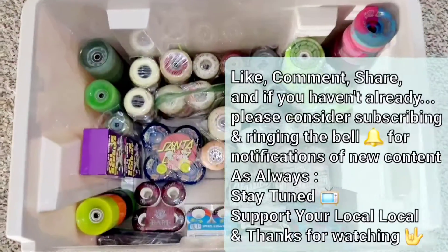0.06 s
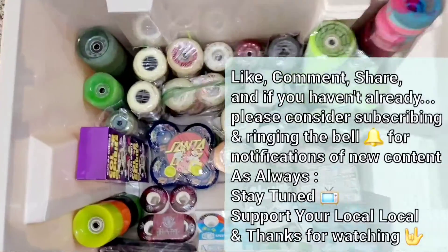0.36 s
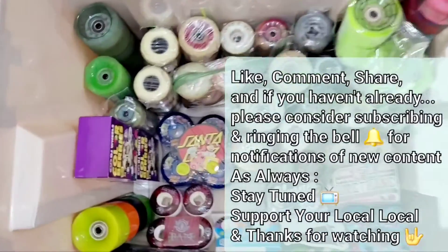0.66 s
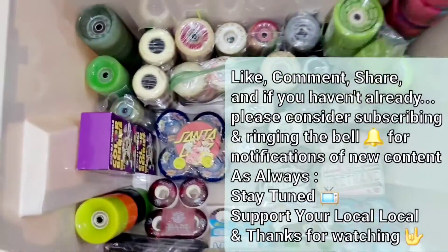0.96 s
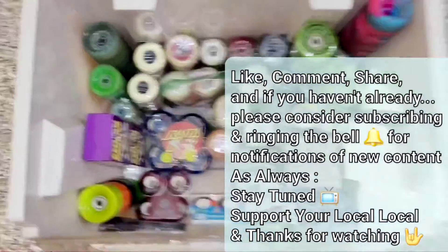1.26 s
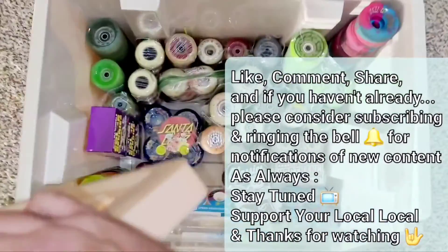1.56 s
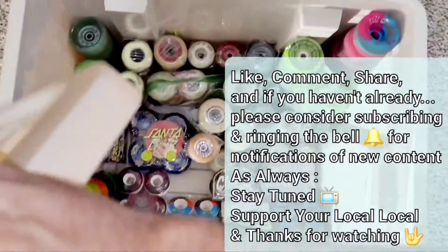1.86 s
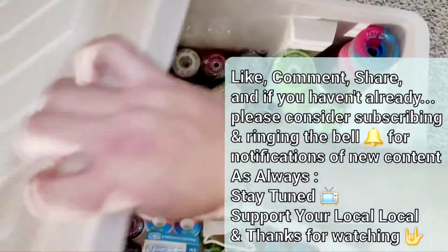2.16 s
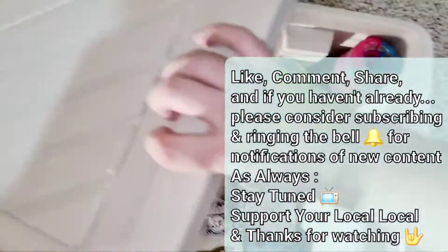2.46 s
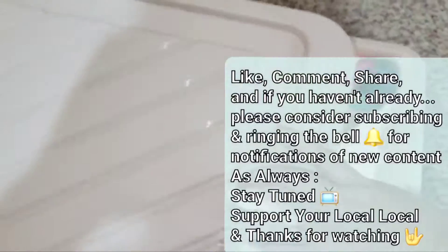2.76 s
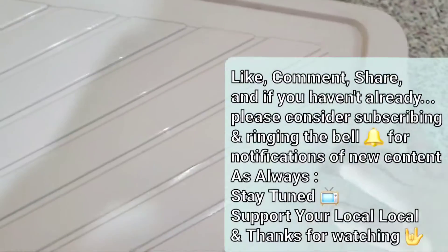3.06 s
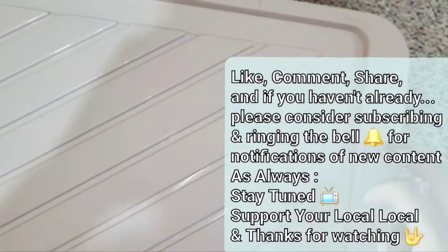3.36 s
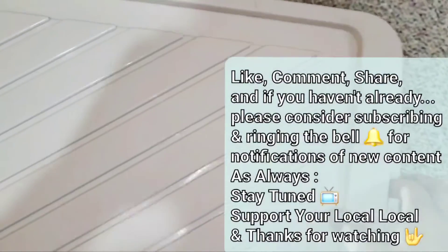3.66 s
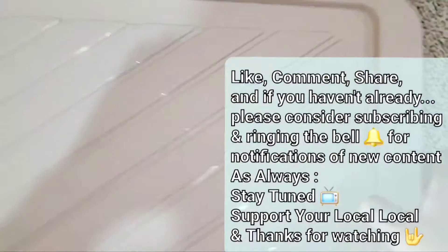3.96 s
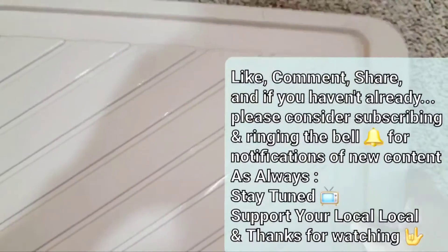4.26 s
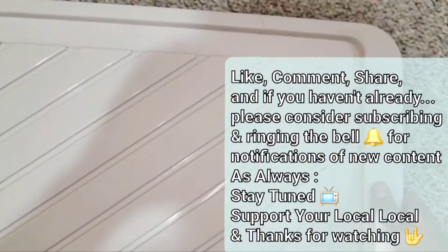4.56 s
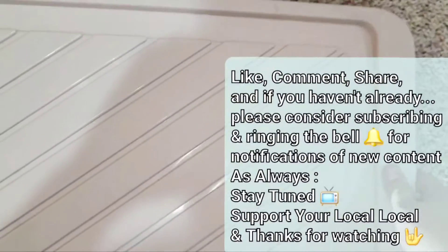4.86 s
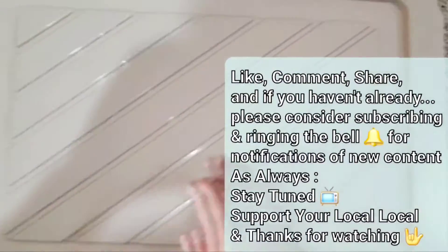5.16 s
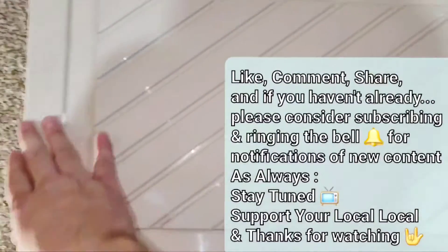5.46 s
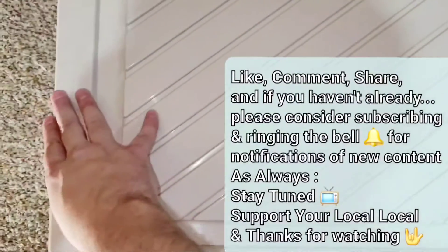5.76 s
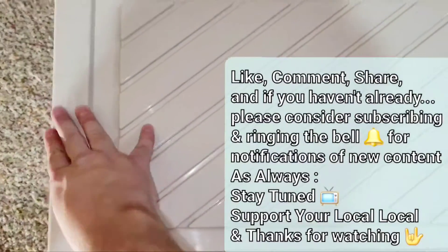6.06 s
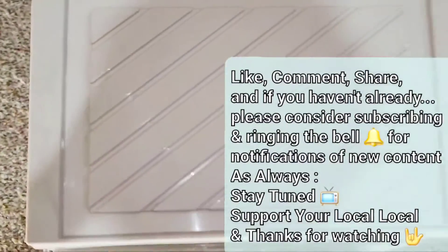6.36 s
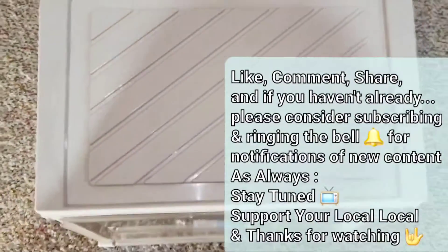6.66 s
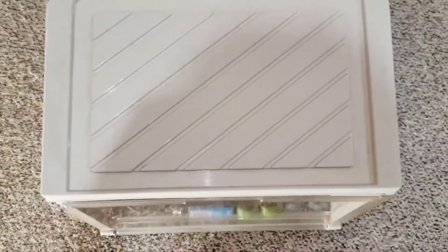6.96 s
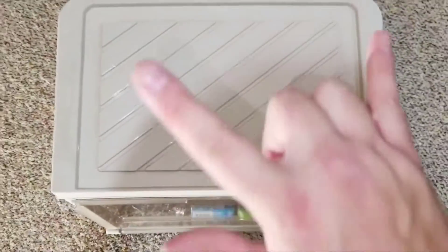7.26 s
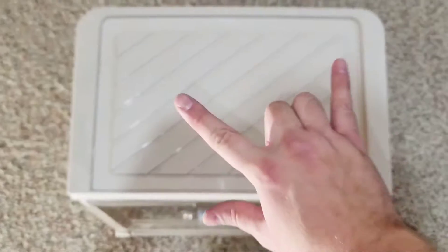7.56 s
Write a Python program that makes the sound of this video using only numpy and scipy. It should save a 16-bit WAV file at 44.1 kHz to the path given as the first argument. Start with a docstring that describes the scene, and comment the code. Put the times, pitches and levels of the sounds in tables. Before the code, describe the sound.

Hollow plastic clatter and rubbing as a lid is slid and pressed onto a tote indoors, ending with a firm snap.

```python
"""Knocks, scrapes and hollow thumps: a plastic lid is laid on a full storage tote, slid into place
and pressed until it snaps home. The rim strikes and rubs the tub and slips over its lip; the wide
panels flex and boom; a small carpeted room answers. Behind it, a faint beating motor hum and a wash
of air. Stereo, at two close microphone ports."""
import sys
import numpy as np
from scipy import signal
from scipy.fft import rfft, irfft
from scipy.io import wavfile
from scipy.ndimage import uniform_filter1d

SR = 44100
rng = np.random.default_rng(int(sys.argv[2]) if len(sys.argv) > 2 else 0)


def wav_record(signal):
    """Record a signal, one row per channel, as 16-bit PCM in the file named by sys.argv[1]."""
    frames = np.transpose(np.atleast_2d(signal))
    bounded = np.clip(frames, -1, 1)
    # unit amplitude maps onto the largest positive 16-bit level
    quanta = np.round(bounded * 32767).astype(np.int16)
    wavfile.write(sys.argv[1], SR, quanta)


N = 339478
TIME = np.arange(2 ** 15) / SR  # one event's buffer
HZ = np.fft.rfftfreq(len(TIME), 1 / SR)
TAIL_FADE = np.clip(3 - 4 * TIME / TIME[-1], 0, 1)
LEAD_S = 64 / SR  # headroom for the earlier port

# rim contacts: (time [s], strength [dB], hardness [steps of ~1 dB/octave], struck spot [Hz],
# after-ring over crack [dB], panel thump [dB], thump tilt [dB/band])
RIM_CONTACTS = [(0.9083, -5.5, 2, 1870, -1, -66, -11), (1.2412, -7, 0, 2830, -13, -71, 1),
                (1.2714, -11, 1.5, 1340, -2, -60.5, 14.5), (1.441, -4, 0.5, 2230, -0.5, -62, 9),
                (1.468, -6, 0.5, 2300, -14, -83, 7), (1.5713, 22.5, 0.48, 1970, -2, -25, 4),
                (1.6446, 19.5, -0.5, 1920, -7, -28.5, 4.5), (2.074, -3.5, 1.5, 3870, -17, -67, -12),
                (2.2898, 24, -0.15, 2350, -7, -29, 14), (2.331, 23, -0.5, 3380, -3, -23.5, 11.5),
                (2.347, 13, 4.5, 660, -8.5, -36.5, -4.5), (2.3753, 12, 2, 1790, -8, -60, 0),
                (2.424, 9.5, 0, 1710, -2.5, -36.5, -3.5), (2.5067, 22.5, 0.44, 1190, -11, -26.5, 5),
                (2.548, 6, 1, 630, 3.5, -29, 6), (2.5994, 21, 0.7, 2840, -12, -34.5, -5),
                (2.6837, 19, 2, 1200, -8, -42.5, 22.5), (2.691, 20.5, -1, 1320, -18, -26.5, 2.5),
                (2.7449, 13, 0.5, 680, -5.5, -33, 8), (2.7905, 10, -0.1, 2170, -4.5, -46, -2),
                (2.8233, 13.5, 0, 1800, -5, -28, -2.5), (2.8315, 13, -1.5, 1990, -8, -42, 9),
                (2.8781, 4, 1, 604, 1.5, -37, 6), (2.983, -0.5, -6, 450, -3.5, -36, 6.5),
                (3.0482, 10.5, -0.5, 1500, -9, -52, -2), (3.1337, 11.5, 0.6, 1600, -9, -35, 1.5),
                (3.6769, -14.5, -16, 478, -11, -43, 6), (3.8052, 15, 1.03, 1060, -10.5, -30.5, 4.5),
                (3.9165, 9, -2.3, 1810, -12, -42, 7.5), (4.044, 5, -2, 674, -7.5, -44, 13.5),
                (4.0909, 1.5, 2, 1740, -3, -38, 7), (4.1288, 13, -3.5, 2140, -8, -24.5, 1),
                (4.144, 7, -3.5, 1490, -4.5, -43, 2), (4.1619, 9, -3, 860, -16, -44, 11),
                (4.2272, 11.5, 0.6, 445, -6, -28.5, 2), (4.234, 4.5, 3.5, 5060, -6.5, -51, 2),
                (4.3484, 12, -2.5, 1460, -7.5, -32.5, 9.5), (4.3721, 8.5, 1.45, 1640, -6.5, -32.5, 3.5),
                (4.417, 2.5, 3, 870, -4, -33.5, 1), (4.451, 4, -1, 620, -5, -32.5, 3.5),
                (4.548, 7, -1, 1583, -14, -43, 6.5), (4.6991, 9.5, 0.55, 2050, -7, -31, 5),
                (4.7118, 8.5, 1.5, 670, -8.5, -40, 2), (4.831, -9, -2, 1760, -9, -71, -5),
                (4.9853, -18, 2, 2380, 2, -62, 4), (5.659, 0, 1.5, 664, -11.5, -41, 5),
                (5.9545, 22, 2.4, 418, -11, -28.5, 3.5), (5.9619, 9.5, 2.5, 3120, 0.5, -58, 3),
                (6.1587, -6, 0, 470, -8.5, -42, 0), (6.346, -12, 3.5, 790, -7, -52.5, -5),
                (6.6292, -10.5, 1, 2980, -8.5, -78, -2)]
# contact position: (time [s], side [-1 right, 1 left])
RIM_SIDE = [(1.6, 0.68), (2.82, 0.76), (2.88, -0.33), (3.13, 0.83), (4.23, 0.67), (4.35, 0.67), (4.45, 0.5),
            (4.55, -0.78), (4.98, -0.11), (5.66, 0.86), (5.95, 0.91), (6.35, 0.76)]
# lid and tub modes: (frequency [Hz], level [dB], free t60 [s])
TOTE_MODES = [(67, 8, 0.59), (82.1, 18, 0.58), (122.4, 7, 0.16), (146.5, 3.5, 0.48), (172, -10, 0.14),
              (221.05, 5.5, 0.92), (238.7, 7.5, 0.3), (298, -31, 1), (377, -11, 0.14), (420.4, 5.5, 0.2),
              (516, 7.5, 0.088), (581, 11, 0.12), (670, 12.5, 0.063), (770, 13, 0.055), (952, 9, 0.1),
              (1020, -22, 0.14), (1350, 6.5, 0.2), (1600, 9.5, 0.13), (1799, 24, 0.025), (1934, 0.5, 0.2),
              (2214, 18, 0.033), (2390, 14, 0.069), (3104, 18.5, 0.026)]
# edges of the three thump bands: (frequency [Hz])
THUMP_EDGES_HZ = [35, 100, 180, 350]
# room field: (frequency [Hz], left-right coherence [-1..1])
ROOM_COHERENCE = [(60, 0.81), (200, 1), (350, 0.6), (600, -0.31), (1400, -0.6), (3000, -0.19), (6000, 0.14)]
# port imbalance: (frequency [Hz], left over right [dB])
PORT_BALANCE_DB = [(100, -6), (400, -1.5), (900, 4), (2600, 2.5), (3400, 4), (4400, -5.5), (6500, -0.5),
                   (8500, -2), (13000, -0.5)]
# microphone response: (frequency [Hz], gain [dB])
MIC_RESPONSE_DB = [(700, -2), (860, -8.5), (1150, -6.5), (3000, -5), (4500, -6.5), (6300, -4),
                   (8200, -13.5), (10000, -13), (13000, -8), (16000, -13)]


def amp(db):
    """Decibels to gain."""
    return 10 ** (np.asarray(db) / 20)


def unit_rms(x):
    """Scale to rms 1."""
    return x / np.sqrt(np.mean(x ** 2) + 1e-20)


def unit_onset(x, span_s=0.04):
    """Scale to unit mean energy per port within the first span_s."""
    return x / np.sqrt(np.sum(x[:, :int(span_s * SR)] ** 2) / 2 + 1e-20)


def curve_at(points, hz):
    """Interpolate (frequency [Hz], value) rows on a log-frequency axis."""
    point_hz, value = np.transpose(points)
    return np.interp(np.log(hz + 1), np.log(point_hz + 1), value)


def add(mix, time_s, sound):
    """Mix in a stereo sound, fading its far tail."""
    part = mix[:, max(round(time_s * SR), 0):][:, :sound.shape[1]]
    fade = np.r_[np.ones(sound.shape[1] - len(TAIL_FADE)), TAIL_FADE]
    part += (sound * fade)[:, :part.shape[1]]


def minimum_phase(gain_db):
    """Causal response with the given gain on HZ."""
    log_gain = np.log(amp(np.maximum(gain_db, -100)))
    mirrored = np.r_[log_gain, log_gain[-2:0:-1]]
    return np.exp(np.conj(signal.hilbert(mirrored)))[:len(gain_db)]


def noise_pair(coherence, size):
    """Spectra of partly coherent white noise at the two ports."""
    left, independent = rfft(rng.standard_normal((2, size)))
    shared = np.clip(curve_at(coherence, np.fft.rfftfreq(size, 1 / SR)), -1, 1)
    return np.array([left, shared * left + np.sqrt(1 - shared ** 2) * independent])


def rim_to_ports(time_s, lag_ms_per_side=0.51, corner_hz=1150):
    """Phase and gain per port: a contact on the left arrives there sooner and louder."""
    side = np.interp(time_s, *np.transpose(RIM_SIDE))
    lag_s = lag_ms_per_side * side / 1000
    turns = HZ * lag_s / np.sqrt(1 + (HZ / corner_hz) ** 2.4)  # levels off in the treble
    pan_db = 1 + side
    return np.exp(1j * np.pi * turns * np.array([[1], [-1]])), amp([[pan_db / 2], [-pan_db / 2]])


def air(treble_db=-58.56, treble_from_hz=900, pan_db=1.1, lag_ms=0.51):
    """Steady moving air and microphone hiss, reaching the left port first."""
    # (frequency [Hz], relative density [dB])
    density_db = [(15, -64), (25, -24), (70, -5), (153, -18), (242, -8.5), (309, -9.5), (503, -18),
                  (734, -14), (840, -16), (1790, -21.5), (2910, -20), (4610, -33.5), (6210, -35),
                  (9570, -47), (16000, -46.5)]
    # (frequency [Hz], left-right coherence [0..1])
    coherence = [(60, 0.99), (130, 0.32), (290, 0.086), (640, 1), (1410, 0.67), (3100, 0.17),
                 (15000, 0.052)]
    hz = np.fft.rfftfreq(N, 1 / SR)
    delay = np.exp(1j * np.pi * hz * lag_ms / 1000 * np.array([[1], [-1]]))
    spectrum = noise_pair(coherence, N) * delay * amp(curve_at(density_db, hz))
    treble_rms = np.std(irfft(spectrum * (hz > treble_from_hz), N))
    return irfft(spectrum, N) / treble_rms * amp(treble_db) * amp([[pan_db], [-pan_db]])


def motor_hum(drift_rad=0.064, pan_db=2.5, step_back_s=(6.37, 7)):
    """Motor orders of about 64 Hz beat against a mains harmonic near 240 Hz."""
    # the microphone steps back through standing waves:
    # (frequency [Hz], level over the tub [dB], level a step back [dB])
    partials = [(64.7, -68, -64.5), (202, -74, -73), (241, -59.5, -60), (256.3, -57, -70),
                (313, -78, -64.5), (446, -70.5, -78)]
    t, out = np.arange(N) / SR, np.zeros((2, N))
    knots_s = np.linspace(0, t[-1], num=40)
    for hz, *levels_db in partials:
        drift = np.interp(t, knots_s, drift_rad * rng.standard_normal(len(knots_s)))
        rms = amp(np.interp(t, step_back_s, levels_db))
        out += rms * np.sqrt(2) * np.sin(2 * np.pi * hz * t + drift)
    return out * amp([[pan_db], [-pan_db]])


def room_tail(near_gain=0.38, near_s=0.02):
    """Diffuse reflections, treble dying first; the tub's near walls lift the start."""
    # (frequency [Hz], t60 [s])
    decay_times = [(100, 0.76), (400, 0.33), (1100, 0.32), (3000, 0.3), (7000, 0.27), (15000, 0.12)]
    noise = irfft(noise_pair(ROOM_COHERENCE, len(TIME)))
    hz, t, frames = signal.stft(noise, SR, nperseg=256)
    fall_db = -60 * t / curve_at(decay_times, hz)[:, None]
    tail = signal.istft(frames * amp(fall_db), SR)[1][:, :len(TIME)]
    return tail * (1 + near_gain * np.exp(-TIME / near_s))


def friction(pressure, centre_hz, width_octaves, slips_per_s=450, hiss=0.065, slip_db=4.5, skirt_db=-30):
    """Tiny slips on plastic, each ringing briefly in rim and room; loudness follows pressure."""
    slips = (rng.random(N) < slips_per_s / SR) * amp(slip_db * np.minimum(rng.exponential(1, N), 4))
    drive = (slips + hiss * rng.standard_normal(N))[:len(pressure)] * pressure
    rim = unit_onset(irfft(noise_pair(ROOM_COHERENCE, len(TIME))) * np.exp(-TIME / 0.0074))
    room = 0.5 * unit_onset(room_tail(), span_s=0.093)
    resonance = np.exp(-(np.log2((HZ + 1) / centre_hz) / width_octaves) ** 2)
    skirt = amp(skirt_db) * HZ ** 2 / (HZ ** 2 + 300 ** 2) / (1 + (HZ / 6000) ** 2)
    ports = amp(curve_at(PORT_BALANCE_DB, HZ) * np.array([[.5], [-.5]]) + curve_at(MIC_RESPONSE_DB, HZ))
    response = irfft(rfft(rim + room) * (resonance + skirt) * ports) * TAIL_FADE
    sound = signal.fftconvolve(drive[None], response, axes=1)
    return sound * np.sqrt(np.sum(pressure ** 2) / np.sum(sound ** 2))


def rubs(strokes, gain_db=0):
    """Friction strokes, each swelling and fading around one resonance."""
    out = np.zeros((2, N))
    for middle_s, length_s, level_db, centre_hz, width_octaves in strokes:
        pressure = amp(level_db + gain_db) * unit_rms(np.hanning(max(int(length_s * SR), 64)))
        add(out, middle_s - length_s / 2, friction(pressure, centre_hz, width_octaves))
    return out


def hand_brushes():
    """The hand hisses lightly over textured plastic."""
    # (middle [s], length [s], level [dB], centre [Hz], width [octaves])
    strokes = [(0.99, .2, -73, 11000, 0.97), (1.27, 0.042, -66, 4140, .08), (1.8, 0.29, -77, 11200, 0.44),
               (2.72, 0.63, -69, 11000, 0.94), (3.06, 0.16, -58.5, 6600, 0.37),
               (3.23, 0.16, -72.5, 5800, .15), (3.61, 0.087, -76, 11900, 0.9),
               (4.24, 0.089, -57, 12400, 0.39), (4.265, 0.098, -63, 5450, 0.1),
               (5.41, 0.27, -70, 5230, 0.2), (5.83, 0.035, -70, 12000, 0.98), (6.19, 0.053, -72, 11000, 1),
               (6.61, 0.055, -79, 13000, .5), (7.58, 0.44, -74, 5260, 0.31)]
    return rubs(strokes, gain_db=2.5)


def rim_scrapes():
    """The rim scrapes the tub, mostly around a knock; narrow bands groan and chirp."""
    # (middle [s], length [s], level [dB], centre [Hz], width [octaves])
    strokes = [(0.9, 0.02, -42, 1730, 0.5), (1.452, 0.044, -43.5, 2190, 0.43),
               (1.568, 0.026, -24, 2000, 0.45), (2.286, 0.02, -23, 2340, 0.35),
               (2.328, 0.02, -25, 1970, 0.44), (2.942, 0.065, -39.5, 1930, 0.29),
               (3.019, 0.034, -36.5, 1720, 0.21), (3.409, 0.057, -42, 690, 0.94),
               (3.79, 0.065, -36, 1180, .8), (4.056, 0.083, -38, 1820, 0.72),
               (4.098, 0.024, -30.5, 1750, 0.13), (4.66, 0.053, -51, 2110, .04),
               (4.665, 0.063, -49, 1650, .12), (4.982, 0.029, -40.5, 1530, 0.61),
               (5.95, 0.016, -23.5, 910, 1)]
    return rubs(strokes)


def lid_slides(wall_hz=690, wall_octaves=0.92, rim_hz=1630, rim_octaves=0.87):
    """The dragged lid rubs tub wall and rim at once, in coarse, creaking slips."""
    # a slide into place, then a nudge home; each: (time [s], level [dB], rim over wall [dB])
    drags = [
        [(2.3, -34, -12), (2.42, -38, 0), (2.55, -33, -6), (2.66, -42.5, -5), (2.76, -39, 1), (2.91, -40.5, -9),
         (2.99, -48, 11.5), (3.09, -35, -3), (3.19, -55, -7), (3.3, -55, -4), (3.52, -72, -24),
         (3.66, -59, -12), (3.76, -81, -6)],
        [(3.99, -53, 16), (4.05, -41, 15), (4.09, -41, 8), (4.16, -40.5, -10), (4.28, -45, 7), (4.34, -64, -5)],
    ]
    out = np.zeros((2, N))
    for drag in drags:
        times_s, level_db, rim_db = np.transpose(drag)
        t = np.arange(times_s[0], times_s[-1], 1 / SR)
        resonances = (-rim_db / 2, wall_hz, wall_octaves), (rim_db / 2, rim_hz, rim_octaves)
        for share_db, hz, octaves in resonances:
            pressure = amp(np.interp(t, times_s, level_db + share_db))
            add(out, times_s[0], friction(pressure, hz, octaves, slips_per_s=300, hiss=0.063))
    return out


def mode_tones(grip_db_per_s=35):
    """Each mode as a dying complex tone, damped further by the hand."""
    return np.array([amp(db - (60 / t60_s + grip_db_per_s) * TIME) * np.exp(2j * np.pi * hz * TIME)
                     for hz, db, t60_s in TOTE_MODES], np.complex64)


def ring(tones, low_hz, high_hz, spread_db=2):
    """One band's modes, struck at random strengths; higher ones reach the ports out of step."""
    hz = np.array(TOTE_MODES)[:, 0]
    strength, direction = rng.standard_normal((2, len(hz)))
    left = -1j * amp(spread_db * strength) * (hz >= low_hz) * (hz < high_hz)
    apart_rad = np.sign(direction) * np.arccos(np.clip(curve_at(ROOM_COHERENCE, hz), -1, 1))
    right = left * np.exp(1j * apart_rad)
    return (np.array([left, right], np.complex64) @ tones).real


def flexed(x, detune):
    """Bending the lid shifts all its modes a little from blow to blow."""
    speed = 1 + detune * rng.uniform(-0.98, 1)
    return np.array([np.interp(TIME * speed, TIME, channel) for channel in x])


def panel_thumps(tones, lag_s=0.0023, swell_s=0.0027, flex_s=0.052, room_gain=0.55,
                 seated_s=3.2, seated_db_per_s=55):
    """Knocked or pressed, the wide panels flex hard, then boom in low modes; seated, they die sooner."""
    # hand pushes without rim contact: (time [s], level [dB], tilt [dB/band])
    presses = [(0.931, -51.5, 11), (1.031, -47, 5.5), (2.576, -29.5, 7.5), (2.772, -28.5, 2),
               (2.835, -34.5, 0), (2.919, -38.5, 7.5), (3.246, -46, 7.5), (3.429, -47, 7),
               (3.611, -39.5, 4), (3.775, -42.5, 10), (4.199, -32.5, 10.5)]
    loose_db, seated_db = [1, -1.5, -5.5], [2, 3, -8.5]  # per band
    blows = [(time_s + lag_s, db, tilt_db) for time_s, *_, db, tilt_db in RIM_CONTACTS]
    bands_hz = list(zip(THUMP_EDGES_HZ, THUMP_EDGES_HZ[1:]))
    filters = [signal.butter(3, edges, "band", fs=SR, output="sos") for edges in bands_hz]
    push = (1 - np.exp(-TIME / swell_s)) ** 2 * (1 + np.exp(-TIME / flex_s))
    out = np.zeros((2, N))
    for time_s, thump_db, tilt_db in blows + presses:
        seated = time_s > seated_s
        levels_db = thump_db + tilt_db * np.array([-1, 0, 1]) + (seated_db if seated else loose_db)
        tail, thump = room_tail(), 0
        for edges, band_pass, level_db in zip(bands_hz, filters, levels_db):
            room = room_gain * unit_rms(signal.sosfilt(band_pass, tail))
            band = push * (unit_rms(ring(tones, *edges)) + room)
            onset_rms = np.sqrt(np.mean(band[:, :int(0.06 * SR)] ** 2))
            thump = thump + amp(level_db) * band / onset_rms
        add(out, time_s, flexed(thump, detune=0.036) * amp(-seated_db_per_s * seated * TIME))
    return out


def pings(releases, room_db, gain_db, rise_cycles=0.31):
    """Released plastic rings as a damped sine; the room follows."""
    out = np.zeros((2, N))
    for time_s, level_db, hz, decay_cycles in releases:
        delay, pan = rim_to_ports(time_s)
        cycles = np.maximum(TIME - LEAD_S, 0) * hz
        envelope = np.exp(-cycles / decay_cycles) * (1 - np.exp(-cycles / rise_cycles))
        ping = amp(level_db + gain_db) * envelope * np.sin(2 * np.pi * cycles)
        room = amp(room_db) * rfft(unit_onset(room_tail()))
        add(out, time_s - LEAD_S, irfft(rfft(ping) * (delay + room)) * pan)
    return out


def panel_booms():
    """A bowed panel pops through and rings on a clean low note."""
    # (time [s], level [dB], pitch [Hz], 1/e decay [cycles])
    pops = [(3.81, -19, 141, 5.1), (3.82, -26, 79.5, 3.7), (4.134, -20, 143, 4), (4.136, -18, 111, 20),
            (4.372, -22, 204, 4.7), (4.385, -24.5, 78.7, 5.6), (4.7, -21.5, 221.3, 8),
            (4.704, -20, 150, 4.3), (6.165, -28, 177, 3)]
    return pings(pops, room_db=-18.5, gain_db=-1.5)


def crack(chatter=1.66, chatter_s=0.0022):
    """Spectrum of a sharp contact plus brief chatter: flat overall, rippled in detail."""
    pulse = chatter * rng.standard_normal(len(TIME)) * np.exp(-TIME / chatter_s)
    pulse *= np.sqrt(2 / (chatter_s * SR))
    pulse[0] += 1
    spectrum = rfft(pulse)
    smoothed_db = 10 * np.log10(uniform_filter1d(abs(spectrum) ** 2, size=400))
    return spectrum * minimum_phase(-smoothed_db)


def rim_knocks(tones, spot_octaves=0.23, modes_db=-5, build_s=0.0043, low_cut_hz=280, gain_db=-0.5):
    """Rim strikes tub: a crack rings the struck spot, more so when dull; lid modes and room follow."""
    # average contact spectrum: (frequency [Hz], level [dB])
    contact = [(300, 3.5), (560, -0.5), (1300, -2.5), (2700, -10), (5500, -21), (11000, -31),
               (16000, -47.5)]
    # added by hardness: (frequency [Hz], gain [dB/step])
    hardness_tilt = [(560, -0.54), (1200, -1), (2700, 1.64), (5500, 3.5), (11000, 5.5), (16000, 10)]
    step_db = curve_at(hardness_tilt, HZ)
    balance_db = curve_at(PORT_BALANCE_DB, HZ) / 2
    ports = np.array([minimum_phase(balance_db), minimum_phase(-balance_db)])
    ports *= np.exp(-2j * np.pi * HZ * LEAD_S)
    low_cut_db = -10 * np.log10(1 + (low_cut_hz / (HZ + 1)) ** 4)
    common_db = curve_at(contact, HZ) + curve_at(MIC_RESPONSE_DB, HZ) + low_cut_db + gain_db
    build = 1 - np.exp(-TIME / build_s)
    out = np.zeros((2, N))
    for time_s, strength_db, hardness, spot_hz, ring_db, *_ in RIM_CONTACTS:
        delay, pan = rim_to_ports(time_s)
        spot_db = (8.5 - 0.8 * hardness) / (1 + (np.log2((HZ + 1) / spot_hz) / spot_octaves) ** 2)
        colour = minimum_phase(strength_db + hardness * step_db + common_db + spot_db)
        direct = crack() * delay
        room = unit_onset(room_tail() * build)
        lid = unit_onset(flexed(ring(tones, THUMP_EDGES_HZ[-1], SR), detune=0.04) * build)
        after_ring = amp(ring_db) * rfft(room + amp(modes_db) * lid)
        add(out, time_s - LEAD_S, irfft((direct + after_ring) * colour * ports) * pan)
    return out


def rim_snaps():
    """The rim slips over the tub's lip and the freed stretch rings: few cycles pop, many tock."""
    # (time [s], level [dB], pitch [Hz], 1/e decay [cycles])
    releases = [(1.571, -13, 1640, 4.7), (1.572, -10.5, 870, 1.8), (1.5725, -15, 530, 11),
                (1.573, -23, 2350, 7), (1.6443, -19, 860, 2.7), (1.6447, -16, 2730, 5.1),
                (2.2902, -10.5, 1286, 7.8), (2.2912, -9, 2380, 5.5), (2.292, -16, 2780, 7),
                (2.291, -23, 3720, 7), (2.295, -16, 677, 9), (2.331, -12, 1590, 5.3),
                (2.3312, -15, 2450, 2.6), (2.3313, -19, 3380, 4), (2.4245, -24, 1780, 8),
                (2.5065, -21, 785, 4.3), (2.5067, -15, 1190, 3.5), (2.507, -13, 2800, 4.5),
                (2.5995, -20, 630, 6), (2.5998, -10, 1070, 1.9), (2.6, -21, 2770, 6.9),
                (2.684, -17, 633, 5.1), (2.6843, -12.5, 1080, 2), (2.69, -14, 486, 3.6),
                (2.691, -20, 1340, 5), (2.745, -24, 3120, 9.1), (2.7905, -24, 606, 3.4),
                (2.8235, -17.5, 663, 5), (2.832, -27, 2860, 6), (3.0478, -19, 1496, 7.7),
                (3.048, -27, 1920, 13), (3.0485, -30.5, 1017, 12), (3.135, -17, 591, 6.5),
                (3.136, -21.5, 271, 4.1), (3.8053, -14.5, 1060, 1.2), (3.8055, -13.5, 1780, 3),
                (3.8058, -19, 607, 2.8), (3.806, -23, 3280, 11), (3.917, -29, 3150, 5.5),
                (4.0435, -25.5, 680, 6.7), (4.1285, -12.5, 1310, 0.84), (4.129, -26, 3250, 5.6),
                (4.2275, -21, 2330, 4.5), (4.229, -18.5, 1420, 3.1), (4.23, -25, 447, 6),
                (4.349, -16, 1410, 4.4), (4.3495, -24, 900, 4), (4.35, -32, 2350, 4.3),
                (4.3718, -16.5, 674, 1.14), (4.372, -14, 2810, 3.4), (4.3722, -25, 1674, 12),
                (4.417, -18, 846, 2.4), (4.4507, -7, 1330, 1.6), (4.453, -34, 1305, 16),
                (4.6995, -26.5, 1140, 10), (4.7, -25, 620, 6.6), (4.98, -41, 616, 9),
                (4.9845, -27, 1320, 2.7), (4.985, -34, 2330, 4.2), (5.9538, -5, 504, 1.16),
                (5.9544, -9, 770, 1.7), (5.9546, -7.5, 1117, 4), (5.9548, -25, 1560, 4.6),
                (5.9545, -14, 3900, 4.4), (5.956, -20, 1222, 12), (5.961, -22.5, 350, 5.5),
                (5.961, -16, 725, 5.8), (6.629, -43, 2900, 8)]
    return pings(releases, room_db=-15, gain_db=-0.5)


def scene():
    """Lid on tub, over hum and air."""
    tones = mode_tones()
    hits = rim_knocks(tones) + rim_snaps()
    bass = panel_thumps(tones) + panel_booms()
    rubbing = rim_scrapes() + hand_brushes() + lid_slides()
    return hits + bass + rubbing + motor_hum() + air()


def record(dry, cutoff_hz=16500):
    """Clip at full scale, then low-pass."""
    low_pass = signal.firwin(511, cutoff_hz, window=("kaiser", 9), fs=SR)
    return signal.oaconvolve(np.clip(dry, -1, 1), low_pass[None], "same")


dry = scene()
out = record(dry)
wav_record(out)
```